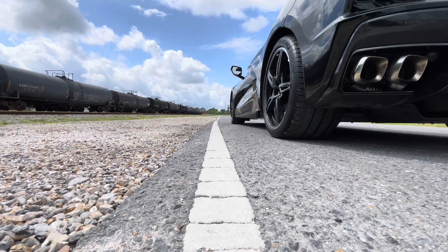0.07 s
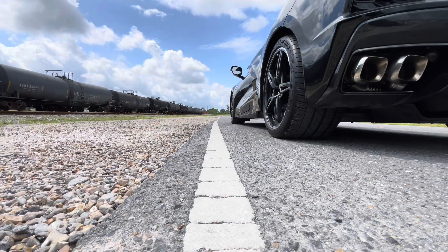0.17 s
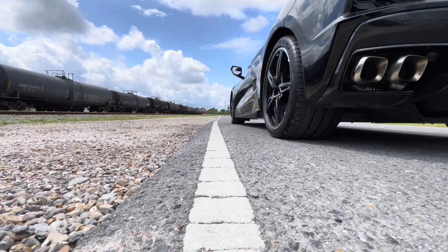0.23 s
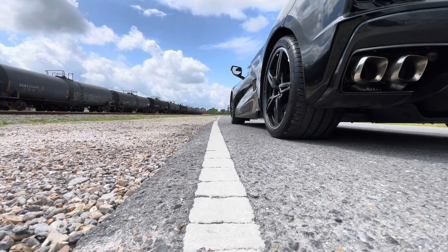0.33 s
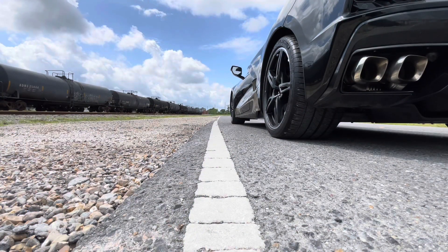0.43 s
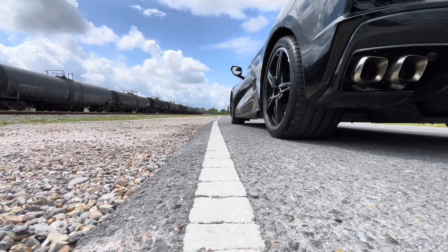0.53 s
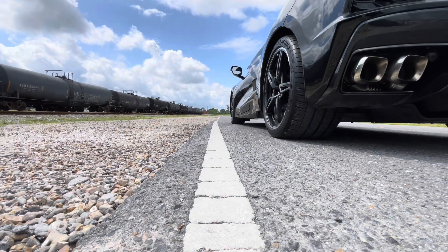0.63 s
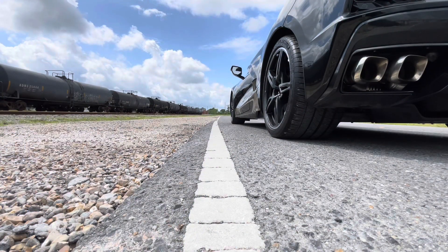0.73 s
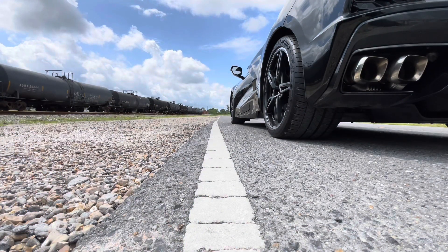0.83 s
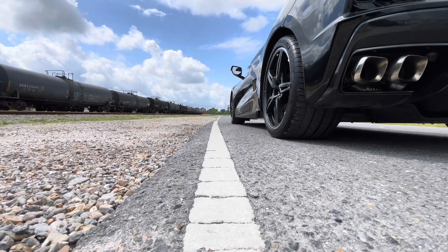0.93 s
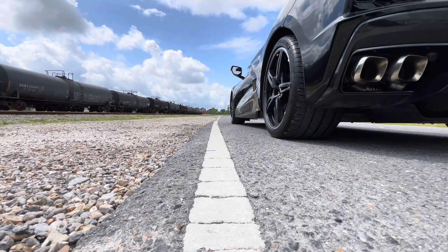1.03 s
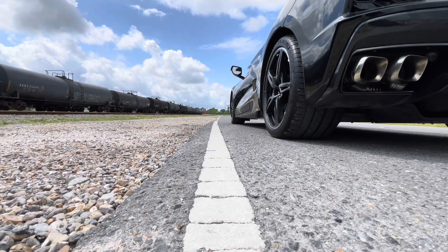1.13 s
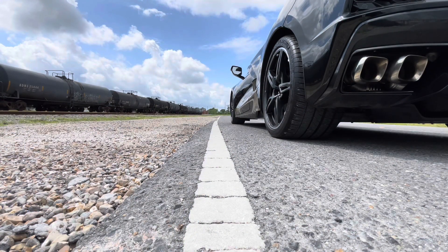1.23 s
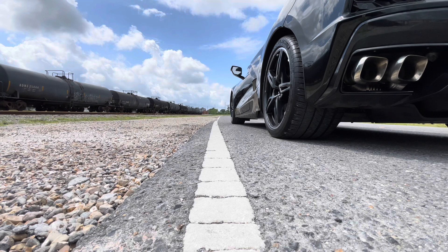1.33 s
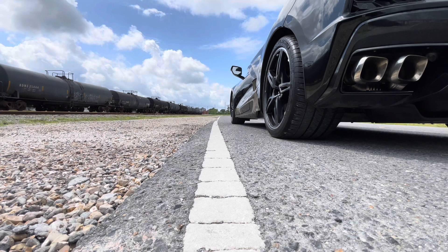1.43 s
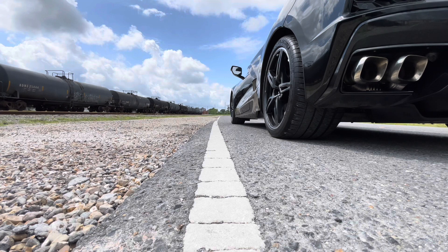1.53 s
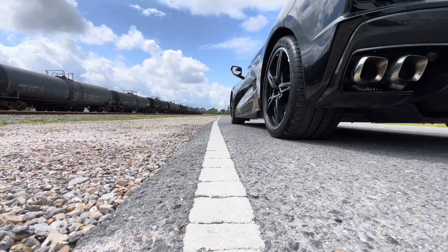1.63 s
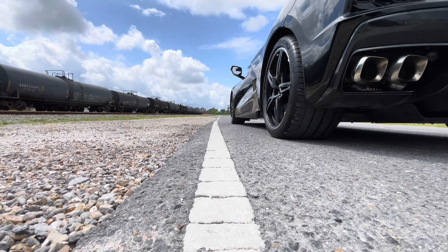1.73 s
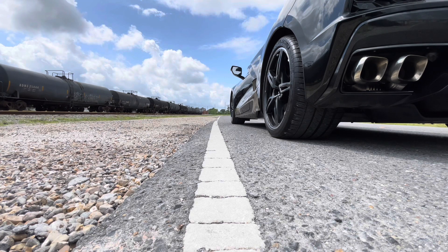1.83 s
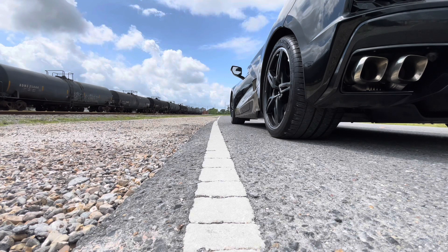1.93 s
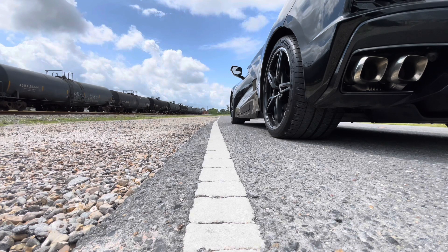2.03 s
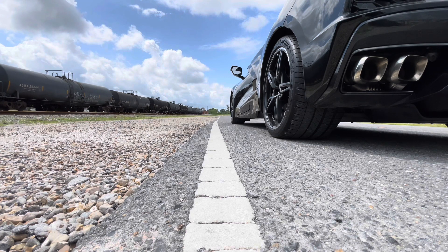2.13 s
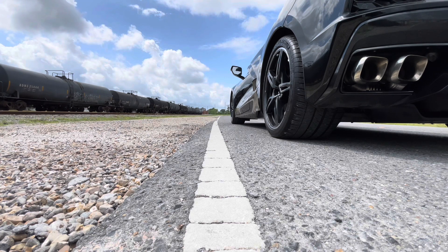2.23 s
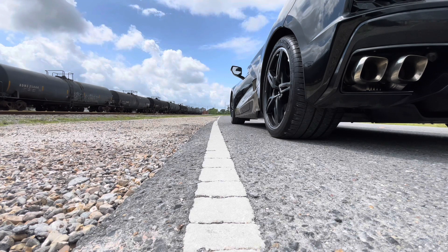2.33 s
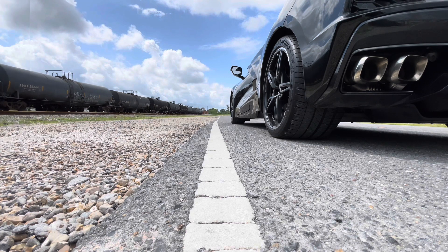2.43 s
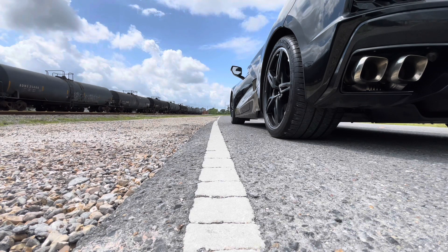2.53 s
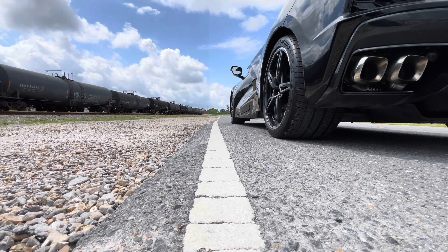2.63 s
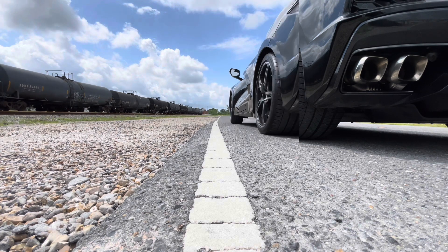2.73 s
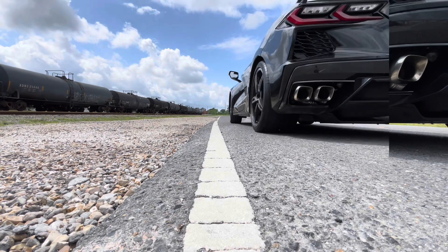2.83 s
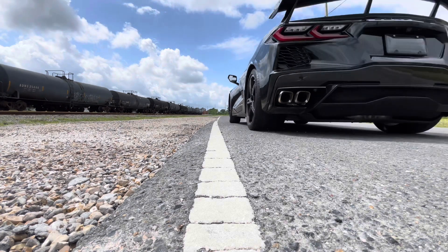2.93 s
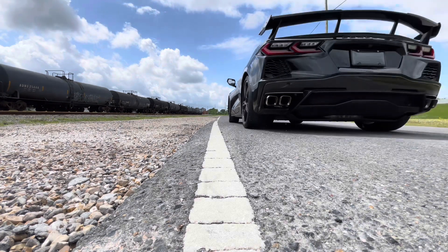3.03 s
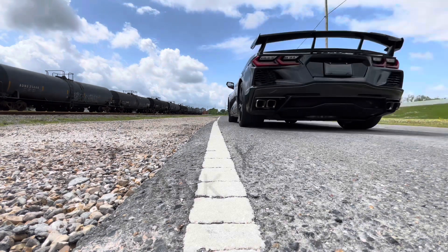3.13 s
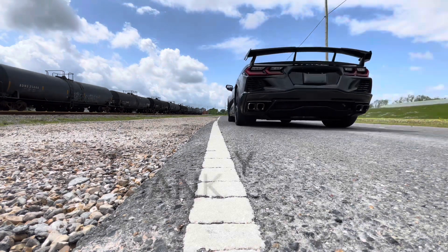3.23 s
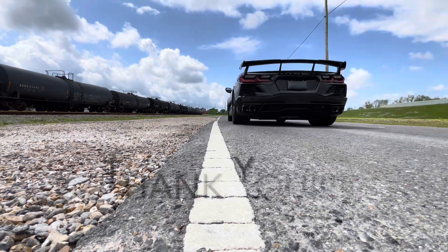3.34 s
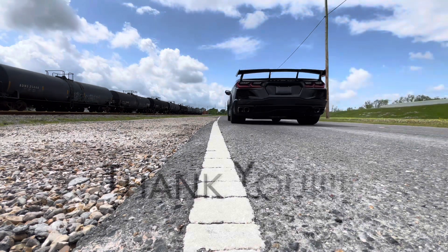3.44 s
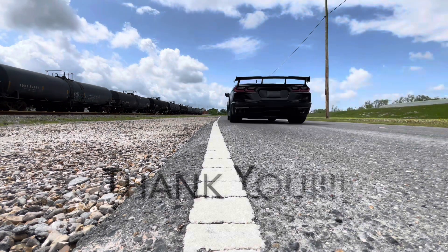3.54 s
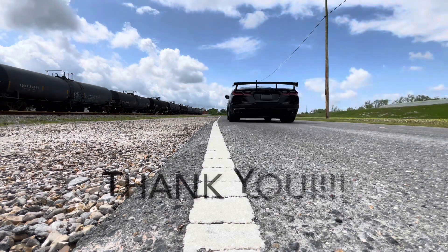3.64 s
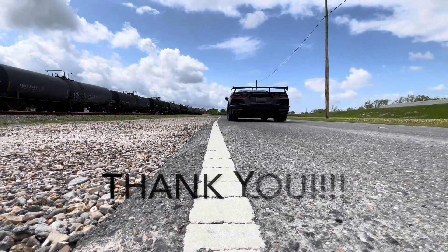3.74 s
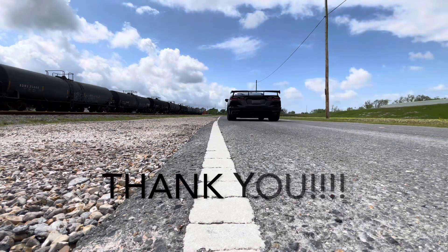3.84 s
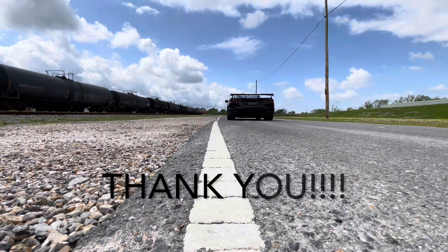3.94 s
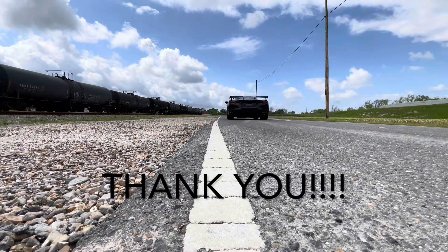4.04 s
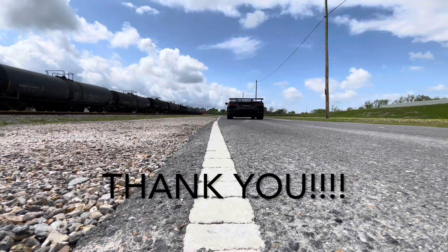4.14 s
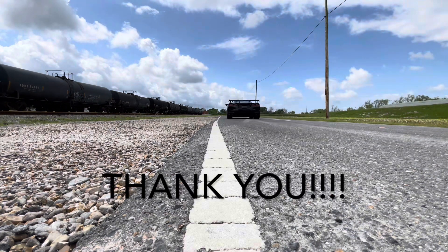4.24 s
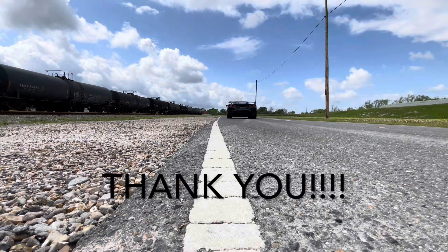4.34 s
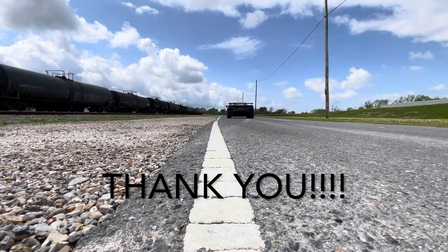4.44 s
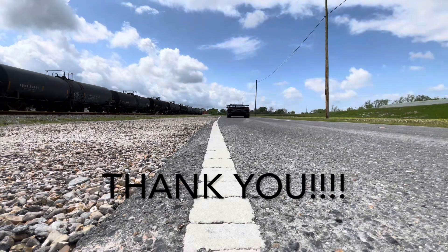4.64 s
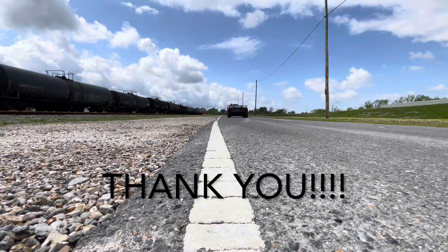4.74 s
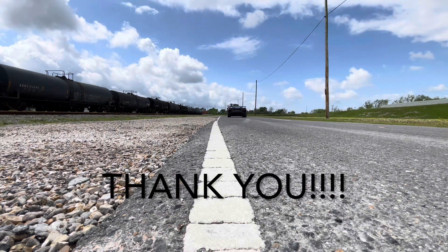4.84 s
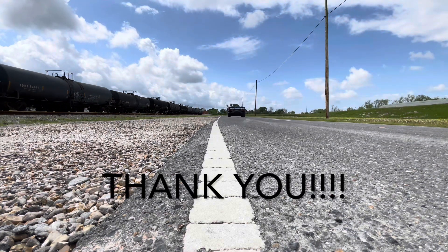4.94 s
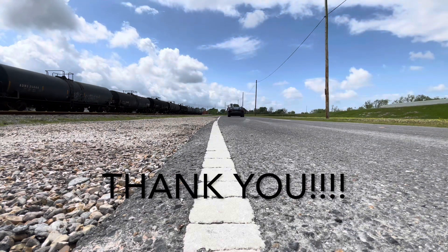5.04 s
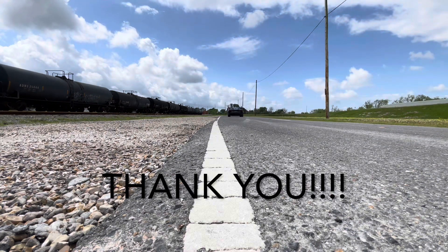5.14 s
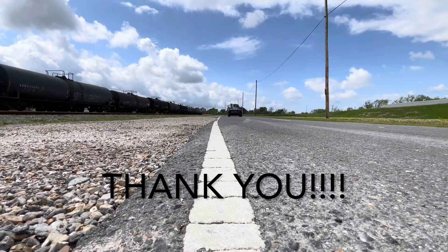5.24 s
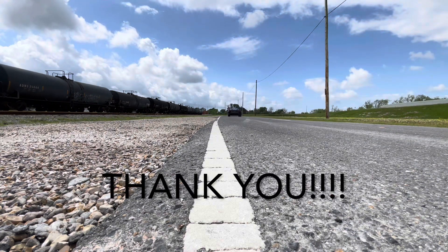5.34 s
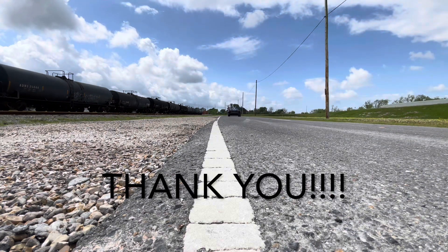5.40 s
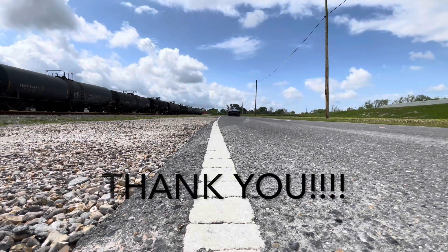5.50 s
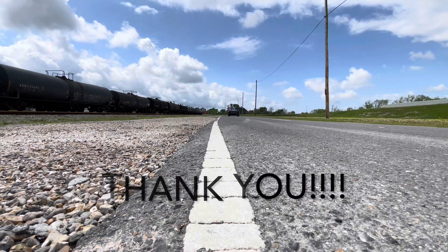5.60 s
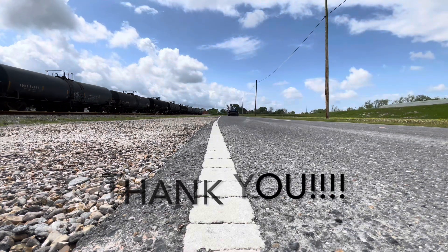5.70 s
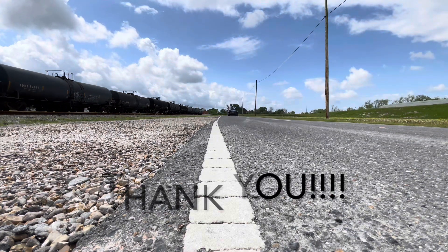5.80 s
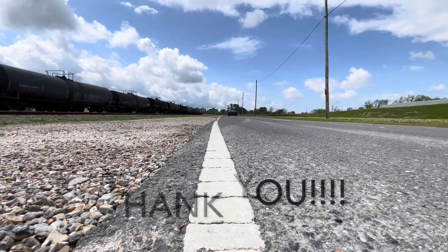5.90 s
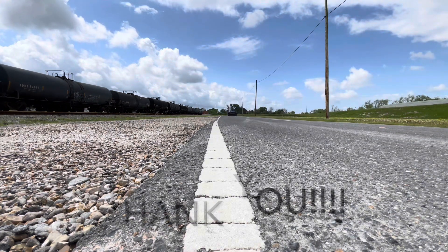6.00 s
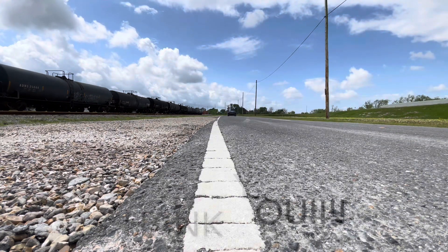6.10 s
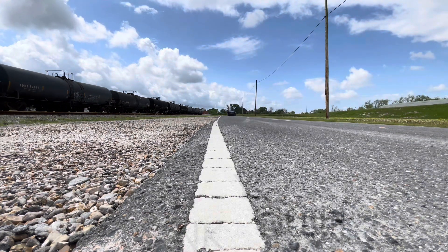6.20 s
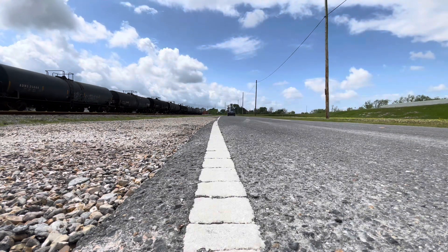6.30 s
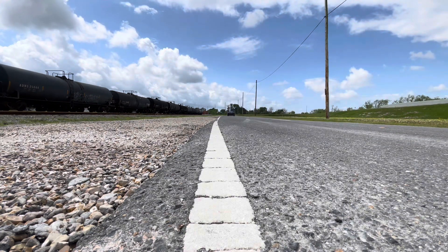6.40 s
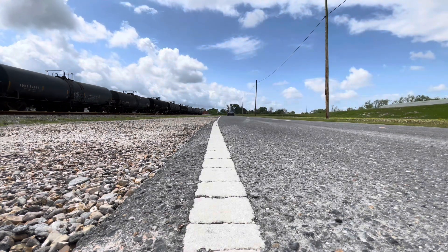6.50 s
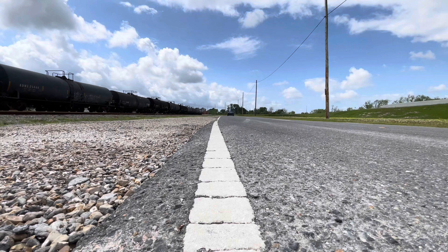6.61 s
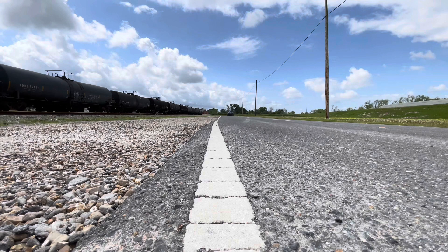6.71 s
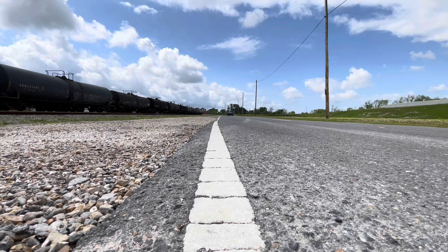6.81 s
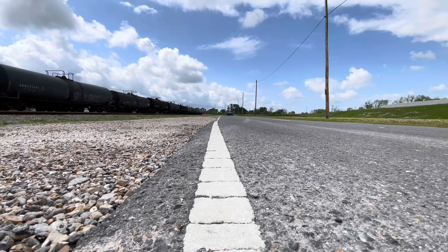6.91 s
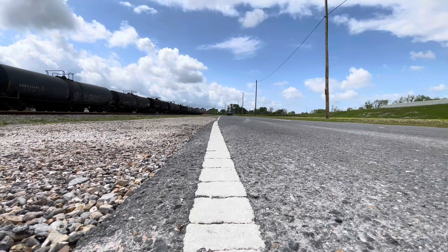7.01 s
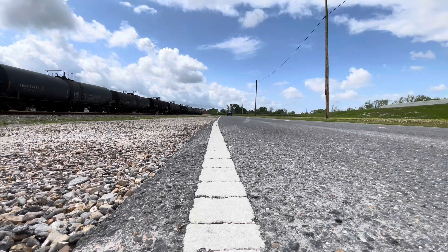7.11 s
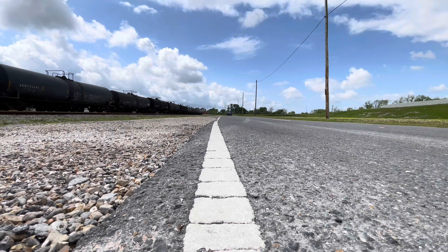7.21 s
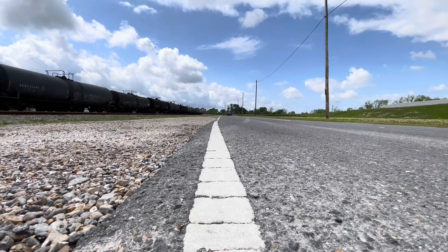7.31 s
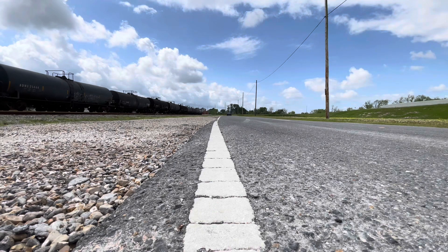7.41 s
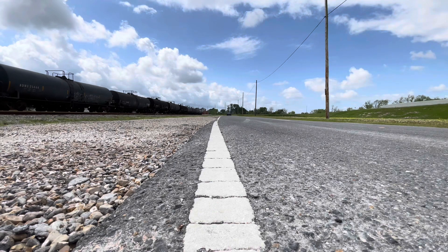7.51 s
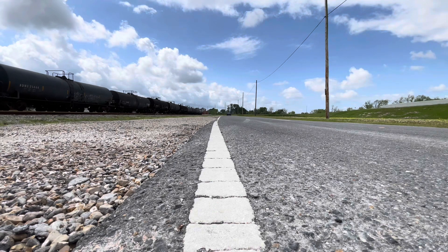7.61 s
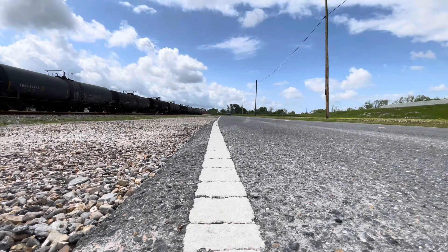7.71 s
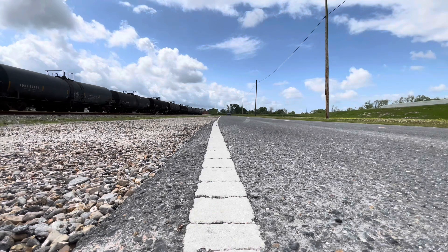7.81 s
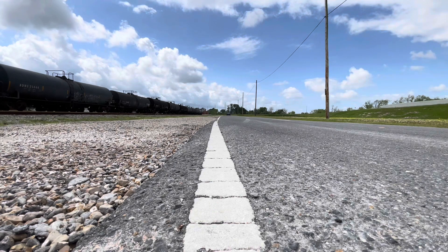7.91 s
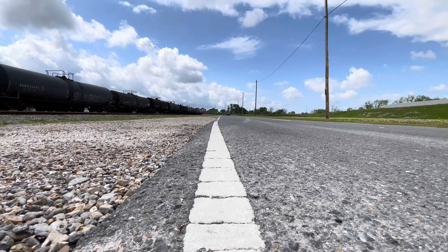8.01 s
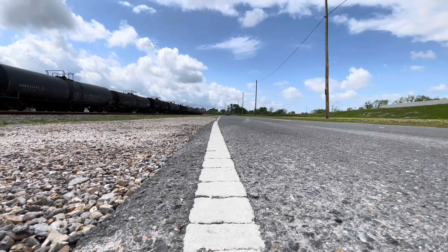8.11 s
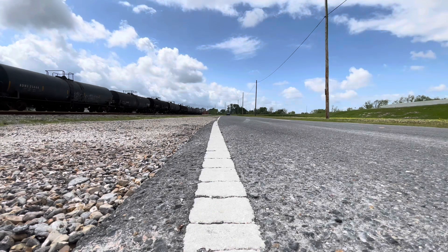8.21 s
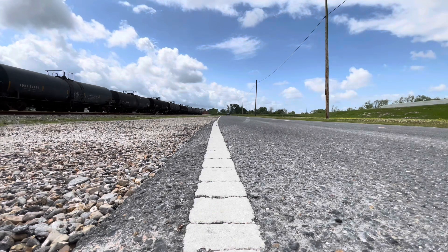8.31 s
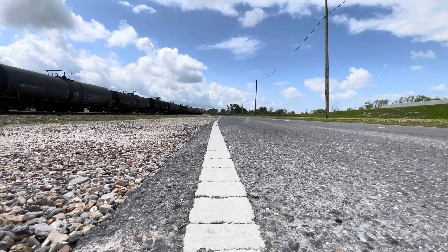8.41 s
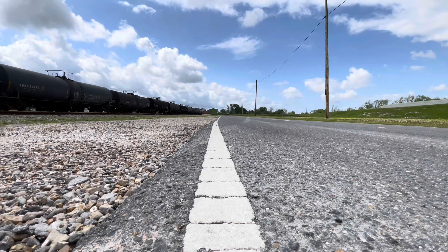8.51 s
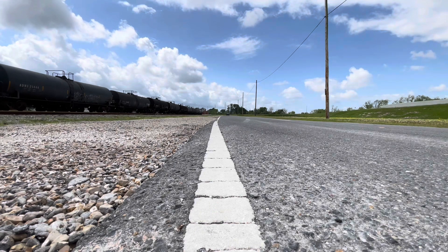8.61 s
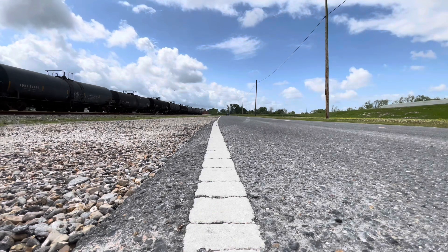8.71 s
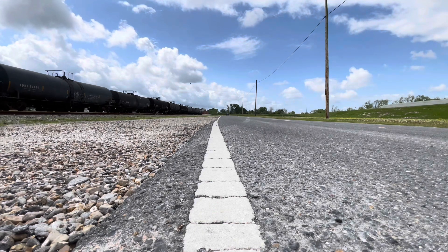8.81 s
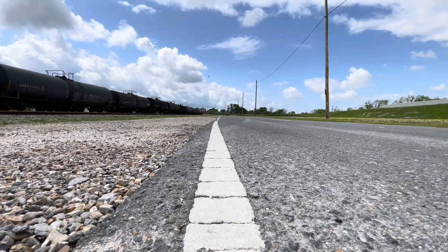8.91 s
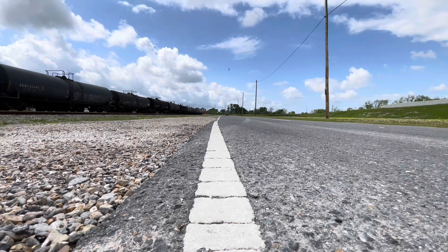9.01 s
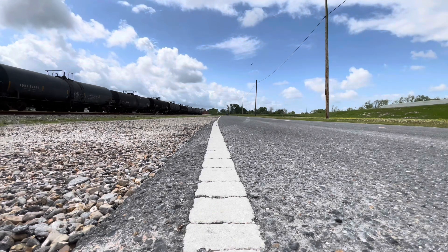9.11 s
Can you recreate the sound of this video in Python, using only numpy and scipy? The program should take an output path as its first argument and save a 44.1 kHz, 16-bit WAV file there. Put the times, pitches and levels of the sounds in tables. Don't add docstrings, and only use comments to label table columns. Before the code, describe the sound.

Close burbling V8 idle, sudden throttle and tyre screech, a hard climbing exhaust howl with popping upshifts, receding down an open road.

```python
import sys
import numpy as np
from scipy import signal
from scipy.fft import rfft, irfft, next_fast_len
from scipy.io import wavfile
from scipy.ndimage import uniform_filter1d

SR = 44100
rng = np.random.default_rng(int(sys.argv[2]) if len(sys.argv) > 2 else 0)


def gain_from_decibels(decibels):
    exponent = np.asarray(decibels, float) / 20
    return 10 ** exponent


def master_out(mix):
    frames = np.transpose(np.atleast_2d(mix))
    ceiling = np.clip(frames, -1, 1)
    pcm = np.round(ceiling * 32767).astype(np.int16)
    wavfile.write(sys.argv[1], SR, pcm)


N = 403515
TIME = np.arange(N) / SR

# [f/Hz, correlation]
NEAR_LIKENESS = [(60, 0.95), (250, 0.95), (600, 0.91), (2000, 0.18), (5000, 0.53), (9000, 0), (10200, 0.92),
                 (12000, 0.0088)]
# [f/Hz, correlation]
FAR_LIKENESS = [(60, 0.52), (130, 0.19), (280, 1), (590, 0.97), (1270, 0.85), (2730, 0.87), (5870, 0.6),
                (9000, 0.34), (10200, -1.4), (12000, 0.96)]
# [f/Hz, left-right/dB]
LAUNCH_LEAN_DB = [(110, 0.5), (200, -1.5), (360, -3.5), (900, -10), (2120, -1), (3840, 1), (6950, 4.5),
                  (12600, -6)]
# [f/Hz, phase/rad]
LAUNCH_TWIST_RAD = [(60, .2), (300, 0.37), (600, 1.33), (1200, 0.77), (2300, 0.94)]


def unit(x):
    return x / np.sqrt(np.mean(x ** 2) + 1e-20)


def along(points, hz):
    f, v = np.transpose(points)
    return np.interp(np.log(hz + 1), np.log(f + 1), v)


def curves(rows):
    s, *cols = np.transpose(rows)
    return [np.interp(TIME, s, c) for c in cols]


def wobble(knots_per_s):
    knots = rng.standard_normal(1000)
    return np.interp(TIME * knots_per_s, np.arange(len(knots)), knots)


def filtered(x, response):
    m = next_fast_len(N + 8192)
    return irfft(rfft(x, m) * response(np.fft.rfftfreq(m, 1 / SR)), m)[..., :N]


def ringing(modes):
    return lambda hz: 1 + sum(gain_from_decibels(db) / (1 + ((hz - c) / w * 2) ** 2) for c, w, db in modes)


def struck(x, modes):
    return filtered(x, lambda f: sum(gain_from_decibels(db) * 1j * f * w / (c * c - f * f + 1j * f * w)
                                     for c, w, db in modes))


def pair(spectrum, alike):
    def gains(hz):
        angle = np.arccos(np.clip(along(alike, hz), -1, 1)) / 2
        return gain_from_decibels(along(spectrum, hz)) * [np.cos(angle), np.sin(angle)]

    mid, side = filtered(rng.standard_normal((2, N)), gains)
    return unit(np.array([mid + side, mid - side]))


def patchy(x, depth_db):
    z = signal.stft(x, nperseg=512)[2]
    field = uniform_filter1d(rng.standard_normal(z.shape[1:]), size=5, axis=0)
    field = uniform_filter1d(field, size=7, axis=1)
    return signal.istft(z * gain_from_decibels(depth_db * unit(field)), nperseg=512)[1][:, :N]


def lean(points, lag_samples, twist):
    def response(hz):
        phase = 2 * np.pi * hz * lag_samples / SR + along(twist, hz)
        return gain_from_decibels(along(points, hz) * [[.5], [-.5]]) * np.exp(-.5j * phase * [[1], [-1]])

    return response


def tones(turns, orders, levels_db, unsteady_db, knots_per_s):
    out = np.zeros(N)
    for k, db in zip(orders, levels_db):
        swell = gain_from_decibels(db + unsteady_db * wobble(knots_per_s))
        out += swell * np.sin(2 * np.pi * (k * turns + rng.random()))
    return unit(out)


def gate(turns, sharp):
    return np.exp(-sharp * (turns % 1))


def voiced(x, levels_db):
    crossovers_hz = [200, 900, 2550, 4000]

    def band(hz, i):
        upper = 1 / (1 + (hz / crossovers_hz[i]) ** 8) if i < len(crossovers_hz) else 1
        lower = 1 / (1 + (hz / crossovers_hz[i - 1]) ** 8) if i > 0 else 0
        return upper - lower

    return sum(gain_from_decibels(db) * unit(filtered(x, lambda hz: band(hz, i))) for i, db in enumerate(levels_db))


def load_orders(turns, close):
    # [nominal multiple of cycle rate (not used), level/dB, extra when
    # close/dB]
    order_levels = [(1, -20, 3), (2.01, 2.5, 6), (2.99, -5.5, 16.5), (4, -19.5, -18), (4.84, 3, 6.5),
                    (5.96, -2.5, 4), (7, -3.5, 8), (7.82, 10.5, -8.5), (9.14, 3, 3.5), (9.82, 16, -32),
                    (11.3, 8, -1), (11.87, 8.5, 0.5), (13.04, 11.5, -15), (14.1, 9.5, -19), (15, -1.5, 6),
                    (16.8, 12.5, 3.5), (16.77, 5.5, -22), (18.21, 14, -7.5), (18.1, -11, 13),
                    (19.92, 8.5, -22), (20.9, 13.5, 0), (22.28, 2.5, 1), (21.9, 4.5, 1), (24.24, 10, -7),
                    (25.24, -1, -17), (26, -28, 6), (29, -5, -15), (27.8, 9, -24), (29.75, 8, -17),
                    (29.8, -10, -7)]
    # [f/Hz, level/dB]
    pipe_colour = [(30, -9), (60, 21), (100, 11), (150, 20), (210, 7.5), (270, 1), (330, 0.5), (400, -4),
                   (500, -5.5), (620, 4.5), (750, -11.5), (950, -6), (1200, -24), (1600, -19)]
    # [f/Hz, width/Hz, level/dB]
    pipe_modes = [(138, 126, -5), (199.4, 4.7, 5), (322.3, 38, 0), (486, 23, -14)]
    # [order, level/dB]
    launch_onset = [(4, -2), (5, 4), (16, 3.5), (19, -14), (24, -6)]
    # [order, level/dB]
    ease = [(2, -1), (3, -10)]
    # [order, level/dB]
    coast = [(5, -1), (14, 4), (21, 8), (16, -6), (25, 6)]
    # [order, level/dB]
    pull = [(3, 2), (6, 4), (12, -10), (13, -0.5), (14, -3.5), (20, -0.5)]
    # [order, level/dB]
    bite = [(4, -5), (7, 7), (8, 5), (20, -5), (21, -5), (2, -3)]
    # [order, level/dB]
    early_climb = [(2, 2.1), (7, 5.5), (8, 2.8), (16, 2.5)]
    # [order, level/dB]
    surge = [(5, 8), (6, 4), (10, 7), (9, -5), (18, -3), (11, 8), (2, -3), (4, -5)]
    # [order, level/dB]
    redline = [(2, 2.5), (4, 14), (10, -14), (11, 4.5), (12, 12.5), (13, -1), (14, 7), (17, 5), (20, 2.5),
               (25, 9), (28, 1)]
    # [order, level/dB]
    howl = [(8, 2), (14, 4.8), (12, 2)]
    # [order, level/dB]
    slip = [(5, -6), (6, -14), (8, -0.5), (10, 3), (17, 5), (18, 3), (19, 3)]
    # [order, level/dB]
    settle = [(4, 12), (6, 13.5), (7, 9), (8, 1.5), (9, -1), (10, 0.5)]
    # [order, level/dB]
    stretch = [(4, 15), (7, -8), (11, 9), (13, -1), (14, 2), (18, -12), (20, -10), (22, 5), (24, 7),
               (25, 5)]
    # [order, level/dB]
    crest = [(3, -6.5), (5, 5), (11, 3), (12, 2)]
    # [order, level/dB]
    build = [(11, -39), (17, -13), (18, 1.5), (22, -1), (25, 3), (28, 8), (30, 4)]
    # [order, level/dB]
    third = [(5, -4), (7, 3), (11, -8), (12, 4.5), (18, 1.5), (24, 4.5)]
    # [order, level/dB]
    drone = [(5, -3.5), (6, 2), (8, 2.5), (11, 10), (12, 4.5), (21, 1.5), (22, 7), (24, 0)]
    # [order, level/dB]
    ebb = [(2, -4), (3, -1), (8, -2), (10, 2.5), (14, -2.5)]
    # [order, level/dB]
    fade = [(5, -9), (6, 9.5), (10, -14), (12, 1)]
    phases = [(2.47, 2.7, launch_onset), (2.94, 3.2, ease), (3.3, 3.68, coast), (3.37, 4.8, pull),
              (3.61, 3.97, bite), (3.8, 4, early_climb), (3.9, 4.12, surge), (4.06, 4.72, redline),
              (4.16, 4.5, howl), (4.58, 5.0, slip), (4.68, 5.42, settle), (5.85, 6.86, stretch),
              (6.35, 6.95, crest), (6.6, 7.2, build), (6.8, 8.1, third), (7.5, 9.3, drone),
              (8.1, 9.4, ebb), (8.5, 9.4, fade)]
    levels_db = [db + close * close_db for _, db, close_db in order_levels]
    for start_s, end_s, changes in phases:
        share = np.clip(np.minimum(TIME - start_s, end_s - TIME) / 0.16, 0, 1)
        for order, db in changes:
            levels_db[round(order) - 1] += db * share
    note = tones(turns, 1 + np.arange(len(levels_db)), levels_db, unsteady_db=2.7, knots_per_s=5)
    return unit(filtered(note, lambda hz: gain_from_decibels(along(pipe_colour, hz)) * ringing(pipe_modes)(hz)))


def load_rush(turns, close):
    # [f/Hz, density/dB per Hz]
    launch_spectrum = [(15, -55), (25, -28), (45, -11), (135, 2.5), (279, -9.5), (332, -3), (436, -4.5),
                       (1240, -10), (1700, -12), (2100, -16.5), (2810, -25), (6070, -30.5), (9500, -36),
                       (12400, -71), (20900, -120)]
    # [f/Hz, density/dB per Hz]
    far_spectrum = [(15, -60), (25, -31), (80, 0.5), (192, -2.5), (265, -16), (323, -7), (436, -10.5),
                    (587, -8), (772, -9), (1890, -15), (2350, -20.5), (2800, -27), (9500, -39),
                    (12400, -77), (20900, -120)]
    # [f/Hz, width/Hz, level/dB]
    roar_modes = [(1325, 200, -8)]
    # [f/Hz, width/Hz, level/dB]
    shell_modes = [(338, 56, -13), (640, 320, -13.5), (1240, 260, -10.5), (4000, 120, -10), (6050, 280, -3)]
    # [t/s, level/dB]
    clarity = [(2.4, 2), (3.6, 4), (3.9, 11), (4.6, 9.5), (6.8, 8), (7, 7), (8.5, 7), (9.1, 2)]
    puffs = 2.4 + 2.5 * close + gate(2 * turns, sharp=1) * gain_from_decibels(3.3 * wobble(60))
    puffs = puffs + 1.3 * gate(turns, sharp=3)
    launch_gas = pair(launch_spectrum[:-2] + [(11400, -34), (13000, -48.5)], FAR_LIKENESS)
    far_gas = pair(far_spectrum[:-2] + [(11400, -44), (13000, -48.5)], FAR_LIKENESS)
    away = np.clip((TIME - 4.5) / .6, 0, 1) * np.pi / 2
    gas = np.cos(away) * filtered(launch_gas, ringing(roar_modes)) + np.sin(away) * far_gas
    gas = patchy(filtered(gas, ringing(shell_modes)), depth_db=1.6)
    return gain_from_decibels(-curves(clarity)[0]) * unit(puffs * gain_from_decibels(0.4 * wobble(11)) * gas)


def drive():
    # [t/s, four-stroke cycles per s in first gear]
    shaft_speed = [(2.4, 15.95), (2.7, 21.4), (3.0, 29.4), (3.2, 28.5), (3.5, 23.2), (3.6, 23.15),
                   (3.8, 30), (4.0, 35.3), (4.4, 49.2), (4.6, 53.2), (4.98, 53.3), (5.08, 56.4),
                   (5.3, 60.6), (6.4, 80.1), (6.84, 86.3), (7.1, 86.6), (8.5, 102.2), (9.15, 100.3)]
    # [t/s, ratio to first gear]
    gear_ratio = [(4.68, 1), (4.72, .71), (4.8, .635), (4.85, .685), (4.95, .6), (5.0, .584), (5.1, .583),
                  (5.18, .557), (5.29, .574), (6.84, .574), (6.89, .416)]
    # [t/s, loudness/dB, edge of the tearing gas/dB]
    effort = [(2.48, -32, -16), (2.62, -28, -16), (2.716, -18, -9), (2.736, -20, 1.5), (3.06, -25.5, 4),
              (3.35, -33.5, 4.5), (3.42, -34.5, -3), (3.64, -34, -5), (3.92, -22.5, -0.5), (4.64, -26, -5),
              (5.03, -35.5, 0), (5.4, -31, -4), (6.8, -29.5, -5.5), (7.34, -29, -12), (7.47, -30, -5),
              (8.53, -27.5, -6.5), (8.66, -33, -10), (9.15, -36.5, -18.5)]
    # boom, bark, rasp, tear, hiss over the loudness [level/dB]
    layer_levels_db = [-2.5, 1, 0, -13.5, -11]
    edge_shares = [0.054, 0.078, 0.82, 0.59, 0.94]
    revs_gains_db = [12, 3.9, 9, 13.7, 9.9]
    far_gains_db = [-6, 0.5, 2, -30, -27.5]
    # [from/s, to/s, level/dB]
    ignition_cuts = [
        (4.657, 4.812, -4.5),
        (4.955, 5.056, -1),
        (5.322, 5.403, -0.5),
        (6.843, 6.886, -4),
    ]
    # [f/Hz, left-right/dB]
    far_lean_db = [(60, -1), (300, 1), (1000, -2.5), (3000, -1.5), (8000, 1.5)]
    # [f/Hz, phase/rad]
    far_twist_rad = [(60, 0.076), (300, 0.21), (600, 0.53), (1500, 0.31), (5000, 0.73)]
    shaft = curves(shaft_speed)[0]
    loud_db, edge_db = curves(effort)
    revs = shaft * curves(gear_ratio)[0]
    travel = np.cumsum(shaft * (TIME > 2.7))
    distance = (travel / travel[-1]) ** 3.83
    turns = np.cumsum(revs * (1 + .0015 * wobble(25))) / SR
    close = np.clip((3.8 - TIME) / 0.36, 0, 1)
    levels_db = [loud_db + db + share * edge_db + rise_db * np.log2(revs / 35) + far_db * distance
                 for db, share, rise_db, far_db
                 in zip(layer_levels_db, edge_shares, revs_gains_db, far_gains_db)]
    levels_db[0] += 3 * close
    cut_db = sum(db * ((TIME > a) & (TIME < b)) for a, b, db in ignition_cuts) + 0.
    cut_db = uniform_filter1d(cut_db, size=300)
    sound = voiced(load_orders(turns, close) + load_rush(turns, close), levels_db) * gain_from_decibels(cut_db)
    aside = np.exp(-np.maximum(TIME - 2.9, 0) / 1)
    beside = filtered(sound * aside, lean(LAUNCH_LEAN_DB, 0, LAUNCH_TWIST_RAD))
    return beside + filtered(sound * (1 - aside), lean(far_lean_db, -1.5, far_twist_rad))


def uneven_firing(turns):
    cylinder_sizes = [-0.05, -0.7, 0.23, -0.62, 0.71, -0.3, -0.25, 0.016]
    # [f/Hz, width/Hz, level/dB]
    chamber_modes = [(55.6, 7.8, 2.5), (94, 13, -9.5), (116, 5.4, -4), (127.5, 7.8, -16.5),
                     (163.5, 11, -14)]
    sizes = np.resize(cylinder_sizes, 600) + rng.uniform(-1.7, 1.7, size=600)
    firings = np.diff(np.floor(turns), prepend=0) * sizes[turns.astype(int)]
    rung = struck(firings, chamber_modes)
    return unit(filtered(rung, lambda hz: 1 / (1 + (44 / (hz + 1)) ** 8) / (1 + (hz / 220) ** 4)))


def idle_rush(turns):
    # [f/Hz, density/dB per Hz]
    gas_spectrum = [(15, -68), (25, -53), (48, -13.5), (103, -20.5), (150, -26.5), (293, -22), (348, -30.5),
                    (519, -26.5), (602, -27), (811, -37), (1010, -40.5), (2400, -51), (2800, -55.5),
                    (3250, -52), (3700, -52), (5780, -47.5), (9500, -49.5), (12400, -89), (20900, -120)]
    # [f/Hz, width/Hz, level/dB]
    tip_modes = [(345.3, 38, 1.5), (520, 43.6, 2), (799, 50.5, 10), (1280, 360, -3), (2360, 170, -4),
                 (5350, 290, -1)]
    # [t/s, peak/dB]
    strong_firings = [(0.096, -35), (0.19, -44), (0.269, -36), (0.377, -45.5), (1.152, -48), (1.571, -39),
                      (2.004, -42), (2.28, -33), (0.324, -33), (0.473, -29), (0.99, -43), (1.303, -38),
                      (0.619, -34), (0.717, -37), (0.808, -57), (0.929, -31), (1.657, -48), (1.747, -36),
                      (1.825, -30.5), (1.914, -31), (2.093, -32), (2.169, -28), (2.238, -32), (2.349, -37),
                      (2.438, -50)]
    # [f/Hz, width/Hz, level/dB]
    knock_modes = [(330, 70, -12), (516, 110, 12), (800, 60, 4)]
    puffs = 1.7 + gate(turns, sharp=0.97) * gain_from_decibels(3 * wobble(45))
    gas = pair(gas_spectrum[:-2] + [(11400, -49.5), (13000, -67)], NEAR_LIKENESS)
    gas = filtered(gas, ringing(tip_modes))
    barks = sum(gain_from_decibels(db + 42 - 60 * np.abs(TIME - s) / .08) * (TIME > s) for s, db in strong_firings)
    rush = puffs * gas + filtered(barks * gas, lambda hz: (hz > 250) & (hz < 950))
    blows = np.bincount([round(s * SR) for s, _ in strong_firings],
                        [gain_from_decibels(db + 76.5) for _, db in strong_firings], N)
    return rush + filtered(struck(blows, knock_modes), lambda hz: 1 / (1 + (hz / 950) ** 8))


def fuel_pump():
    # [t/s, peak/dB]
    strokes = [(0.1795, -44.5), (0.2803, -44), (0.4504, -46), (0.5686, -42.5), (0.611, -42), (0.6654, -55),
               (0.7213, -43), (0.7642, -41), (0.818, -49), (0.8789, -43), (0.9188, -45), (0.9757, -43),
               (1.0355, -42), (1.0784, -48), (1.1383, -48), (1.2002, -45), (1.2426, -42.5), (1.4107, -40),
               (1.5319, -43), (1.5803, -43), (1.708, -39), (1.7524, -38), (1.8048, -47), (1.93, -38),
               (1.9864, -50), (2.0577, -36), (2.1041, -40), (2.1645, -45), (2.2383, -40), (2.286, -34.5),
               (2.4154, -45), (2.4553, -40),
               (0.001, -33),
        (0.045, -42),
        (0.095, -40),
        (0.24, -42),
        (0.32, -43),
    ]
    t60_s = .09
    cam = sum(gain_from_decibels(db - 60 * np.abs(TIME - s) / t60_s) * (TIME > s) for s, db in strokes)
    noise = pair([(2800, -25), (4200, -24.0), (5500, -7), (7000, -20), (8200, -25), (9000, -8),
                  (9800, -51)], NEAR_LIKENESS)
    return gain_from_decibels(1 * wobble(16)) * cam * patchy(noise, depth_db=4.0)


def idle():
    # [t/s, firings per s]
    firing_rate = [
        (0.0, 62.5),
        (0.21, 58.3),
        (0.38, 56),
        (0.58, 54.8),
        (0.82, 50.8),
        (1.29, 47.9),
        (1.79, 46.6),
        (2.38, 43.6),
        (2.75, 43.2),
    ]
    # [multiple, level/dB]
    firing_orders = [(1, 3), (2, 4.5), (3, -9), (4, -12.5)]
    # boom, bark, rasp, tear, hiss [level/dB]
    idle_levels_db = [-20.5, -36.5, -53, -61.5, -54]
    fast_gains_db = [-1, 1.5, 2, 0, 0.5]
    opening_gains_db = [1.1, 19.2, 17, 4.8, 18.6]
    # [t/s, level/dB]
    stumbles = [
        (.31, -1),
        (.585, -5),
        (.79, -8.5),
        (1.05, -2.5),
        (1.32, -2.5),
        (1.57, -7),
        (1.86, 0.5),
        (2.08, 0.5),
        (2.38, -1),
    ]
    # [f/Hz, left-right/dB]
    near_lean_db = [(60, -2.0), (150, -2), (360, -4), (870, -7), (2120, -4.5), (5160, 4.5), (12600, -3)]
    rate = curves(firing_rate)[0]
    turns = np.cumsum(rate * (1 + .008 * wobble(9))) / SR
    opening = np.clip((TIME - 2.37) / 0.31, 0, 1)
    levels_db = [db + fast_db * (rate - 47) / 15 + open_db * opening
                 for db, fast_db, open_db in zip(idle_levels_db, fast_gains_db, opening_gains_db)]
    levels_db[0] += sum(db * np.exp(-((TIME - s) / 0.021) ** 2) for s, db in stumbles)
    orders, orders_db = np.transpose(firing_orders)
    note = tones(turns, np.round(orders), orders_db, unsteady_db=1.8, knots_per_s=10)
    note += gain_from_decibels(-3.5) * uneven_firing(turns)
    mix = note + gain_from_decibels(-2.0) * unit(idle_rush(turns)) + gain_from_decibels(-29.0) * unit(fuel_pump())
    return filtered(voiced(mix, levels_db), lean(near_lean_db, 20.7, [(60, 0.014)]))


def tyres():
    # [t/s, f/Hz, peak/dB, length/s]
    chirps = [(2.56, 1350, -41, 0.048), (2.66, 1370, -38, 0.033), (2.745, 1650, -30, 0.0089),
              (2.92, 1380, -22, .014), (2.8, 1500, -25, 0.0092), (2.776, 1400, -14.5, 0.016),
              (2.781, 1000, -20, 0.012), (2.831, 980, -15.5, 0.013), (2.838, 1200, -18, 0.017),
              (2.886, 1200, -19, 0.027), (2.872, 750, -25, 0.065), (2.971, 755, -20, 0.049),
              (2.819, 1000, -25, 0.0091), (2.69, 740, -31, 0.014), (2.95, 1126, -16, 0.014),
              (2.977, 1100, -18, 0.013), (3.047, 1400, -20, 0.017), (3.105, 1200, -16.5, 0.015),
              (3.153, 1605, -17.5, 0.028), (3.182, 1360, -23.5, 0.014), (3.27, 1500, -40, 0.0088),
              (3.27, 1060, -18, 0.0061), (3.36, 1700, -34, .014), (3.446, 670, -41, 0.0098)]
    # [f/Hz, width/Hz, level/dB]
    tread_modes = [(730, 37, -5), (1089, 70, 0), (1260, 77, 0.5), (1453, 110, -1.5), (1700, 90, -9)]
    # [t/s, level/dB]
    wheelspin = [
        (2.71, -60),
        (2.75, -34),
        (2.97, -25),
        (3.19, -34),
        (3.4, -47),
        (3.46, -70),
    ]
    rise_hz_per_s = 2000
    squeaks, rough = np.zeros(N), 0.85 + 0.35 * wobble(105)
    for s, hz, db, length_s in chirps:
        age = TIME - s
        glide_hz = hz + rise_hz_per_s * age * (length_s < .03)
        squeaks += gain_from_decibels(db - 1.5) * np.exp(-(age / length_s) ** 2) * np.sin(2 * np.pi * glide_hz * age)
    tread = struck(struck(rng.standard_normal(N), tread_modes), tread_modes)
    squeal = gain_from_decibels(curves(wheelspin)[0] + 2.5 * wobble(35)) * unit(tread)
    return filtered(squeaks * rough + squeal, lean(LAUNCH_LEAN_DB, 0, LAUNCH_TWIST_RAD))


def pops():
    # [t/s, peak/dB, rise/s, crack/dB]
    bangs = [
        (4.664, -30, .007, -12),
        (4.818, -19, .0065, -32),
        (6.82, -25, .006, -18),
        (6.896, -21.5, .009, -11),
        (6.925, -28, .008, -11),
        (6.966, -34, .005, -8),
        (6.991, -34, .005, -8),
        (7.074, -34, .005, -8),
        (7.4, -28, .004, -14),
    ]
    # [f/Hz, level/dB]
    muffler_modes = [(110, -4), (200, -5), (330, 2), (560, 0.5), (645, 5), (930, -7), (1100, -10.5),
                     (1290, -8), (1420, -10.5)]
    blast, crack = np.zeros((2, N))
    for s, db, rise_s, crack_db in bangs:
        age = np.maximum(TIME - s, 0) / rise_s
        shape = gain_from_decibels(db) * age * np.exp(1 - age)
        ring = sum(gain_from_decibels(level_db) * np.sin(2 * np.pi * (hz * (TIME - s) + rng.random()))
                   for hz, level_db in muffler_modes)
        blast += shape * unit(ring)
        crack += shape * gain_from_decibels(crack_db)
    noise = pair([(300, 4), (2500, 15.5), (3500, 2.0), (5000, 5.0), (12000, -16)], FAR_LIKENESS)
    return gain_from_decibels([[-3], [-2]]) * blast + crack * noise


def whine():
    # [t/s, f/Hz, level/dB]
    whistle = [
        (4.75, 4850, -85),
        (4.8, 4750, -70),
        (4.86, 4600, -80),
        (5.05, 4200, -74),
        (5.17, 3960, -63),
        (5.27, 3770, -69),
        (5.33, 3700, -85),
    ]
    hz, db = curves(whistle)
    return gain_from_decibels(db + 7 + 4 * wobble(40)) * np.sin(2 * np.pi * np.cumsum(hz) / SR)


def wind():
    # [t/s, level/dB]
    gusts = [
        (3.46, -35),
        (4.65, -27),
        (4.8, -38),
        (6.04, -36.5),
        (7.139, -37),
        (7.75, -35),
        (8.25, -38),
        (8.5, -41),
    ]
    swell = sum(gain_from_decibels(db) * np.exp(-((TIME - s) / .035) ** 2) for s, db in gusts)
    thump = pair([(30, -30), (60, -3), (100, 0), (150, -8), (250, -40), (400, -90)], [(60, .85)])
    rumble = pair([(30, -17.5), (50, -3.5), (75, -4.0), (150, -70.0)], [(60, 0.17)])
    rumble_db = -45.0 + 6.4 * np.clip(TIME - 7.9, 0, 1)
    hiss = pair([(1500, -25), (3500, -2), (12000, -19)], [(60, 0.29)])
    return swell * thump + gain_from_decibels(rumble_db) * rumble + gain_from_decibels(-66) * hiss


def scene():
    # [t/s, idle share, load share]
    handover = [
        (2.42, 1, 0),
        (2.5, 1, 1),
        (2.6, 1, 1),
        (2.76, 0, 1),
    ]
    idle_share, load_share = curves(handover)
    return load_share * drive() + idle_share * idle() + tyres() + pops() + whine() + wind()


def low_pass(x):
    return signal.sosfilt(signal.butter(12, 13190, fs=SR, output="sos"), x)


def record(dry):
    # [f/Hz, level/dB]
    side_colour = [(2000, 1.5), (4200, 4), (5300, 1.5), (6200, -0.5), (7500, -3.5), (9000, -1),
                   (10200, 7.5), (11500, -0.5)]
    faint_db, ceiling = -103, .9
    mid_side = np.array([dry[0] + dry[1], dry[0] - dry[1]]) / 2
    hz, t, z = signal.stft(mid_side, SR, nperseg=2048)
    top_power = np.mean(np.abs(z[0, (hz > 10800) & (hz < 12000)]) ** 2, 0)
    top_db = 10 * np.log10(top_power + 1e-20)
    wide = np.clip((top_db - faint_db) / 11, 0, 1.25)
    ragged = np.abs(rng.standard_normal((3, len(t))))
    low_hz, high_hz, side_hz = ragged * [[300], [450], [150]] + [[250], [250], [11300]]
    hz = hz[:, None]
    top_band = (hz > 11350 - wide * low_hz) & (hz < 11350 + wide * high_hz)
    mid_gain = (hz < 9700) | top_band
    side_gain = (hz < side_hz) * gain_from_decibels(along(side_colour, hz))
    mid, side = signal.istft(z * np.array([mid_gain, side_gain]), SR, nperseg=2048)[1][:, :N]
    ports = np.array([mid + side, mid - side])
    ports = ports / (1 + np.abs(ports / ceiling) ** 6) ** (1 / 6)
    return low_pass(ports)


dry = scene()
out = record(dry)
master_out(out)
```